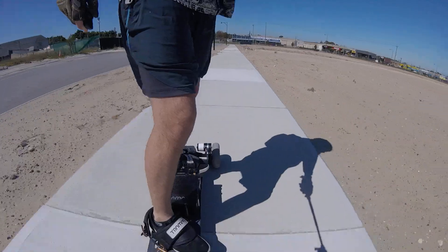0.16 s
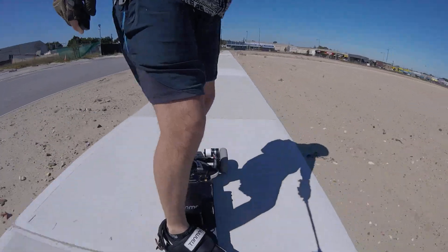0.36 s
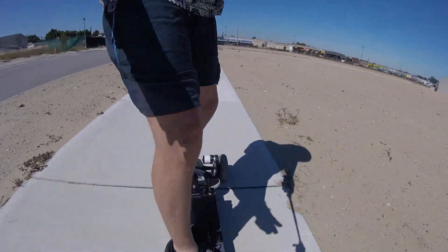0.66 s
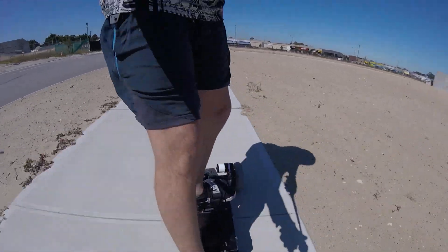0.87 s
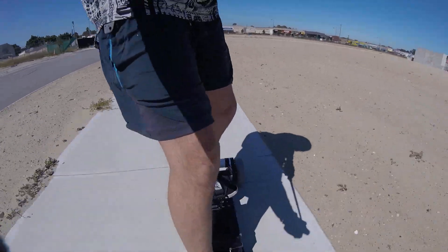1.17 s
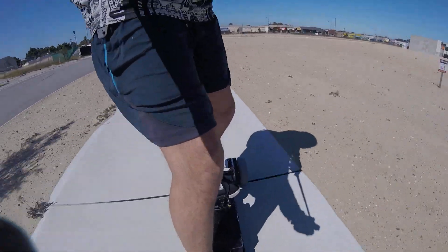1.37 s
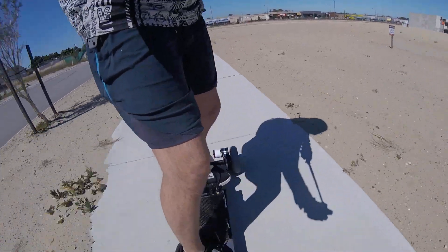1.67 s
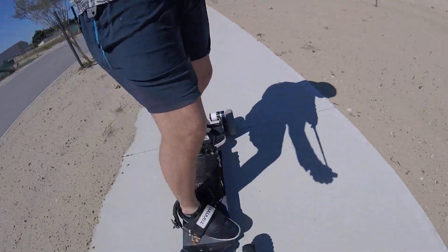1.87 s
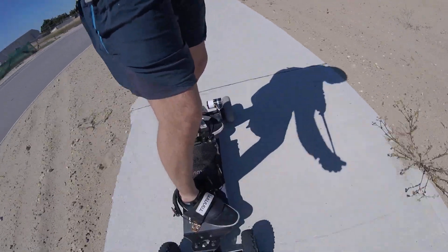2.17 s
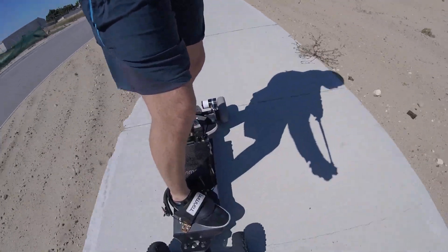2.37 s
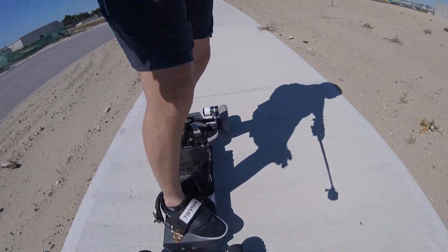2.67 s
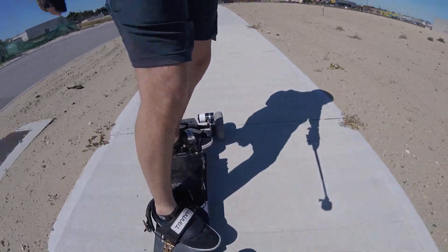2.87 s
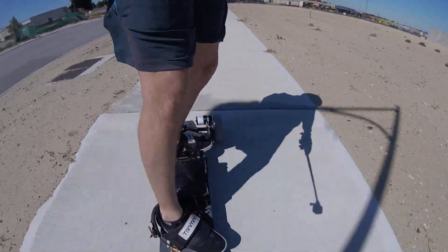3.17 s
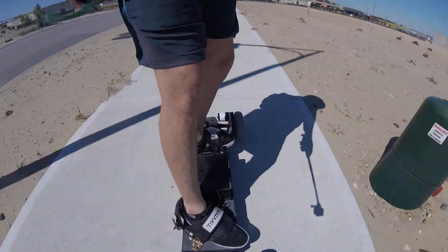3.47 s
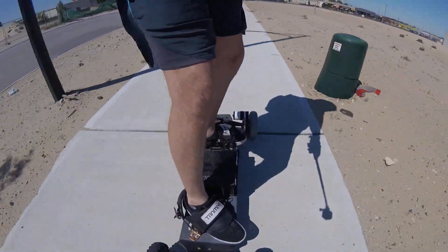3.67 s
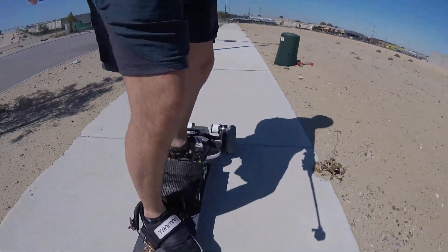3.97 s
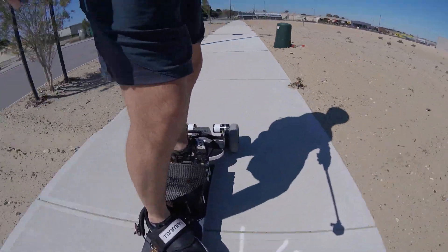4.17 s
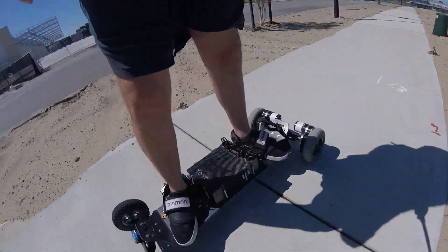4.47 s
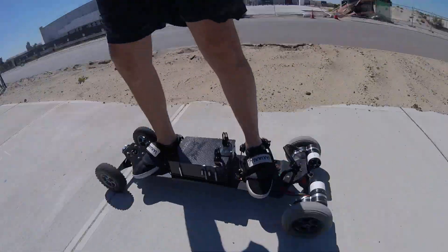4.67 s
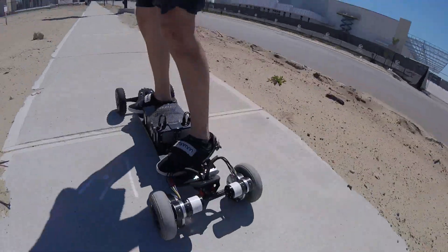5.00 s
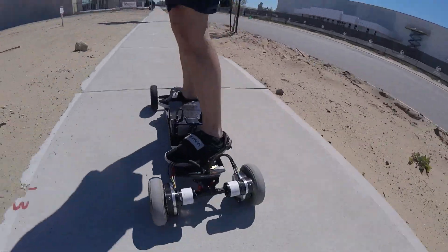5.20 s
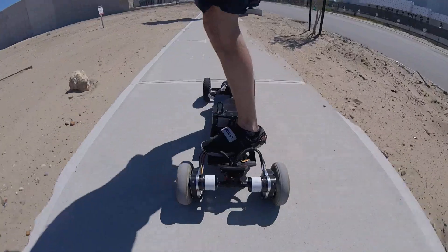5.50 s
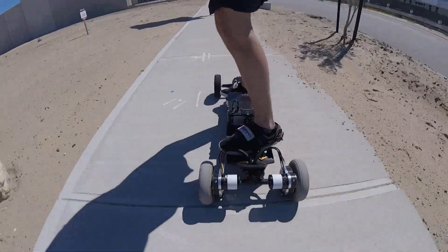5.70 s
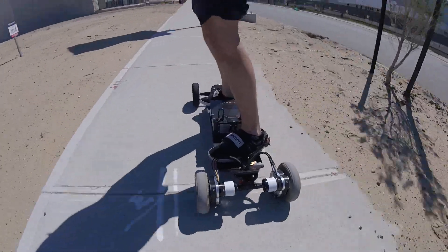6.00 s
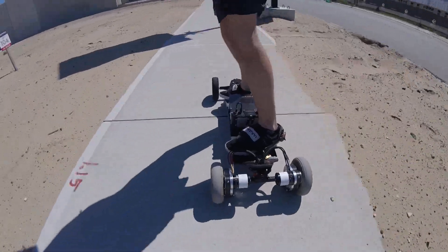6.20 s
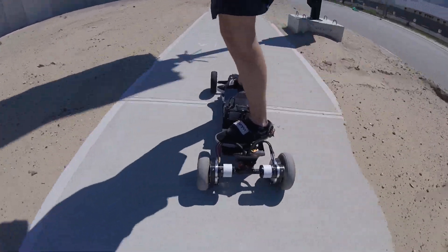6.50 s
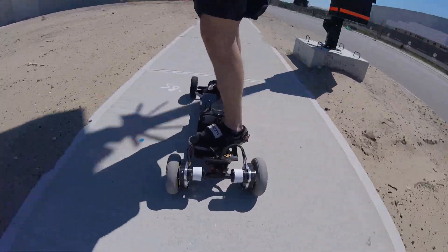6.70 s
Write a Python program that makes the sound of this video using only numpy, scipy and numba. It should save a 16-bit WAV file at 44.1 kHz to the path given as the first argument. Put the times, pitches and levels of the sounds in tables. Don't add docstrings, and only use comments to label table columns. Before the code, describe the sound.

Heavy wind rumbles and thumps on a small microphone while a motorized board grinds along a concrete path, rattling over joints and whining faintly.

```python
import sys
import numpy as np
from scipy import signal
from scipy.fft import rfft, irfft
from scipy.io import wavfile
from scipy.ndimage import uniform_filter1d
from numba import njit

SR = 44100
rng = np.random.default_rng(int(sys.argv[2]) if len(sys.argv) > 2 else 0)


def dump_mix(stems):
    frames = np.atleast_2d(stems).T
    limited = np.clip(frames, -1, 1)
    pcm = np.round(limited * 32767).astype(np.int16)
    wavfile.write(sys.argv[1], SR, pcm)


def decibels_to_gain(level_db):
    exponent = np.asarray(level_db, float) / 20
    return 10 ** exponent


N = 302085
T = np.arange(N) / SR

# start_s, gust_db, tearing_db (above the rumble)
GUSTS = [(0, -15, -9.5), (.5, -17.5, -9.5), (.77, -25.5, -14.5), (.92, -19, -15), (1.315, -19.5, -10),
         (1.335, -32, -6.5), (1.96, -39.5, -10), (2.0, -28, -5.5), (2.4, -29, 3.5), (2.44, -26.5, -9),
         (2.55, -35, -13), (3.1, -25, -11.5), (3.59, -31, -8.5), (4.4, -24, -14), (4.53, -32, -2),
         (4.55, -48, 6.5), (5.5, -34.5, -14.5), (5.8, -41, -9)]
# start_s, length_s, extra_db
BUFFETS = [(.36, 0.037, -5), (.5, 0.041, -6), (1.2, 0.11, 2.5), (1.46, 0.051, 2.5), (2.53, 0.17, -3),
           (3.14, 0.05, 4), (3.32, 0.045, 4), (3.47, 0.027, -6), (3.4, 0.052, 6), (.03, 0.21, -2.5),
           (2.03, 0.093, -4), (4.36, 0.034, 1.5), (6.55, .2, 4), (5.55, .07, 2), (1.3, .04, 2),
           (3.65, 0.098, 0), (4.22, 0.046, -4.5), (5.2, 0.093, 3), (5.644, .11, 15.5), (5.87, 0.18, -6),
           (6.052, .12, 3), (6.17, .04, -9), (6.422, 0.19, 3)]
# pitch_hz, level_db (per Hz)
RUMBLE_COLOUR = [(47, -29), (80, 5), (200, 7), (350, -3.5), (480, -15), (620, -21), (1060, -120)]
# pitch_hz, level_db (per Hz)
SWAY_COLOUR = [(14, -33), (25, -7.5), (70, -7.5), (110, -10), (200, -23)]
# start_s, peak_db, swing_hz, crack_db (above the peak)
SLAPS = [(0.397, -8, 132, -29), (0.532, -1, 108, -26), (0.846, -5, 64.6, -25), (2.002, -17, 247, -17),
         (2.211, -20, 133, -6), (2.415, -5.5, 137, -25), (2.438, -12.5, 116, -27), (3.346, -9, 102, -33.5),
         (3.643, -15, 90, -21), (4.106, -4, 114, -31), (5.503, -11.5, 128, -23), (5.646, -13, 96.5, -20),
         (5.668, -2.5, 87, -14), (5.682, -24, 67.3, -19), (5.699, -8, 133, -17), (5.714, -36, 64, -14),
         (5.73, -14.5, 176, -5.5), (5.74, -11.5, 58.4, -11), (6.053, -16, 75.4, -44.5),
         (6.123, -20, 65.5, -18), (6.431, -29, 59.2, -22), (6.497, -12.5, 171, -48),
         (6.717, -21, 77.6, -16), (6.823, -5, 157, -10.5), (6.835, -8, 51.4, -16)]
# start_s, peak_db, tick_db (above the peak), thud_db
KNOCKS = [
    (1.747, -10.5, -8.5, -36),
    (1.786, -10.5, -13, -20),
    (1.923, -16.5, -36, -17.5),
    (2.097, -20.5, -43, -18.5),
]
# pitch_hz, level_db, t60_s
STICK_MODES = [(622, 4.5, 0.01), (1180, 5.5, 0.003), (1790, -19, 0.007)]
# pitch_hz, level_db, t60_s
CASE_MODES = [(2600, -3, 0.0044), (3350, 6.5, 0.0024), (4870, 2, 0.0052), (5630, 5.5, 0.0033),
              (6330, 4.5, 0.0089), (7630, -4, 0.0064)]
# start_s, dip_db, recovery_s
DUCKS = [
    (1.79, -3.5, 0.31),
    (1.93, -0.5, .25),
    (5.625, -12, 0.63),
]
# start_s, peak_db, length_s, bright_db (above the body)
RATTLES = [(0.26, -25, 0.04, -29), (0.348, -30.5, 0.037, -21), (0.473, -27, 0.024, -15),
           (1.375, -30.5, 0.032, -39), (1.6, -26, 0.063, -35), (1.856, -29, 0.013, -45),
           (2.288, -40, 0.031, -8), (2.362, -26.5, 0.04, -17), (2.483, -28.5, 0.03, -11.5),
           (2.593, -30.5, 0.045, -18), (2.782, -31.5, 0.046, -25), (2.832, -44.5, 0.026, -32),
           (3.101, -18, 0.057, -18), (3.16, -36, 0.036, -6), (3.232, -24, 0.047, -24),
           (3.37, -19, 0.057, -18.5), (3.413, -28, 0.038, -6), (3.5, -23, 0.05, -33),
           (3.6, -29.5, 0.059, -27), (3.648, -44.5, 0.022, -24), (3.673, -29, 0.012, -11),
           (3.811, -27.5, 0.028, -16), (3.853, -38.5, 0.02, -13), (3.92, -29, 0.021, -12.5),
           (4.222, -31, 0.034, -37), (4.357, -34, 0.035, -37), (4.5113, -19, 0.025, -19),
           (4.643, -25.5, 0.021, -42), (5.077, -26, 0.047, -26), (6.704, -32.5, 0.044, -28)]
# start_s, peak_db, length_s, bright_db (above the body)
TICKS = [(0.246, -22, 0.013, -29), (0.5638, -24, 0.0031, -37), (0.687, -24.5, 0.0079, -33),
         (0.9098, -27.5, 0.0073, -23), (1.034, -28, 0.0062, -34), (1.146, -24, 0.006, -34),
         (1.7586, -52, 0.0033, -25), (1.9744, -31, 0.0062, -37), (3.394, -17.5, 0.011, -23),
         (4.6079, -28, 0.0061, -43), (4.6772, -22, 0.0068, -46), (4.9437, -23.5, 0.008, -25),
         (5.249, -23.5, 0.0066, -33), (5.286, -23.5, 0.01, -31), (5.5035, -26, 0.01, -25)]
# pitch_hz, width_hz, level_db
RATTLE_BODY = [(1030, 1250, 15), (2120, 1950, 8), (3440, 4000, -2.5), (4980, 920, 7), (7400, 760, -3)]
# on_s, off_s, rise_s, whine_db (gears), hum_db (housing)
THROTTLE = [
    (-.1, .49, .02, -41.5, -41),
    (2.5, 3.47, 0.13, -48, -51.5),
    (4.6, 4.75, 0.061, -53, -47.5),
    (6.097, 6.95, 0.34, -45.5, -47.5),
]
CHIRP_DEPTH = [3, 7.5, 5, 2.5]
# on_s, off_s
COIL_TIMES = [
    (-.1, .5),
    (6.07, 6.95),
]
# pitch_hz, level_db
COIL_LINES = [
    [(9432, -66.5), (10567, -68)],
    [(7058, -79), (7897, -65), (8156, -73), (9162, -86), (9340, -74), (9582, -66), (9997, -94),
     (10234, -80), (10411, -69), (10605, -70), (10880, -81), (12075, -97)],
]
# start_s, rough_db
ROUGHNESS = [(0, 3.5), (.2, 1.5), (.36, 4), (.51, -1), (.9, -0.5), (1.61, 0), (2.05, -3), (2.33, -2),
             (2.77, 0.5), (3.08, 0), (3.43, 1), (3.61, 1.5), (3.97, 0), (4.29, 0), (4.96, 2), (5.6, 0.5),
             (6.75, -2.5), (6.85, -11)]
# start_s, length_s, extra_db
FLEXES = [
    (.15, 0.51, -13),
    (1.0, 0.32, -7),
    (1.4, 0.39, 3.5),
    (4.9, 0.094, 8),
    (5.2, 0.19, 6.5),
    (5.9, .9, -0.5),
]
# pitch_hz, level_db (per Hz)
TREAD_COLOUR = [(350, -3.5), (600, -4), (848, -4), (1070, 2), (1650, -2.5), (2750, -5.5), (4150, -15),
                (4910, -19.5), (5600, -22), (7280, -54), (12300, -120)]
# pitch_hz, level_db (per Hz)
HISS_COLOUR = [(2470, -14), (4200, -4), (5030, 2.5), (5580, 3.5), (5870, 2), (6190, -8), (6700, -0.5),
               (7260, -5.5), (9870, -16), (10900, -19), (14200, -56), (22000, -120)]
# pitch_hz, level_db (per Hz)
AIR_COLOUR = [(7000, -31), (8500, -0.5), (10000, -2), (11500, -4), (13800, -4.5), (14500, -36)]
# pitch_hz, limit_db
HIDING = [(5500, -32), (6300, -33), (8500, -30.5), (9500, -26), (10300, -28.5), (11000, -33), (14000, -48)]


def unit(x):
    return x / np.sqrt(np.mean(x ** 2))


def noise():
    return rng.standard_normal(N)


def curves(table):
    s, *columns = np.transpose(table)
    return [np.interp(T, s, c) for c in columns]


def gate(on, off, rise, fall):
    return np.clip(np.minimum((T - on) / rise, (off - T) / fall), 0, 1)


def swells(table, rise, fall):
    return sum(db * gate(s, s + length, rise, fall) for s, length, db in table)


def walk(rate):
    hold = int(SR / rate)
    steps = np.repeat(rng.standard_normal(N // hold + 1), hold)
    smooth = uniform_filter1d(uniform_filter1d(steps, hold), hold)
    return unit(smooth[:N])


@njit
def svf(x, hz, width):
    y, b, l = np.empty(len(x)), 0., 0.
    for i in range(len(x)):
        g, k = np.tan(np.pi * hz[i] / SR), width / hz[i]
        v = (b + g * (x[i] - l)) / (1 + g * (g + k))
        b, l, y[i] = 2 * v - b, l + 2 * g * v, k * v
    return y


def band(x, hz, width_hz):
    hz = hz + np.zeros(N)
    return svf(svf(x, hz, 1. * width_hz), hz, 1. * width_hz)


def coloured(table, shared_db, flicker_db, rate):
    hz, db = np.transpose(table)
    f = np.maximum(np.fft.rfftfreq(N, 1 / SR), 1)
    shape = rfft(noise()) * decibels_to_gain(np.interp(np.log(f), np.log(hz), db, left=-150, right=-150))
    octave = np.log2(f / hz[0])
    out = 0
    for centre in np.arange(0, np.log2(hz[-1] / hz[0]) + .5, .5):
        share = np.cos(np.pi / 2 * np.clip(2 * (octave - centre), -1, 1)) ** 2
        out = out + irfft(shape * share, N) * decibels_to_gain(shared_db + flicker_db * walk(rate))
    return unit(out)


def add(out, s, x):
    i = int(s * SR)
    out[i:i + len(x)] += x[:N - i]


def ring(modes):
    t = T[:SR // 8]
    x = -sum(decibels_to_gain(db) * np.sin(2 * np.pi * hz * t) * 1000 ** (-t / t60) for hz, db, t60 in modes)
    return x / np.max(np.abs(x))


def behind(front, back):
    swing_s, swing_length_s = 4.7, 0.37
    return front + (back - front) * np.clip((T - swing_s) / swing_length_s + .5, 0, 1)


def duck():
    return decibels_to_gain(sum(db * (T > s) * np.exp(-np.maximum(T - s, 0) / back) for s, db, back in DUCKS))


def wind():
    rumble_db, tear_db = curves(GUSTS)
    rumble_db = rumble_db + swells(BUFFETS, .02, .015) + 1.28 * walk(9)
    sway_db = 4 - 0.48 * (rumble_db + 40)
    lumps = walk(28)
    rumble = coloured(RUMBLE_COLOUR, 1.12 * lumps, 0.87, 14)
    rumble = unit(rumble - .12 * (rumble ** 2 - 1))
    sway = coloured(SWAY_COLOUR, 2.2 * lumps, 1.6, 9)
    tear = unit(band(noise(), 358, 424) * decibels_to_gain(1.4 * lumps + 3.4 * walk(60)))
    out = decibels_to_gain(rumble_db - 0.5) * (rumble + decibels_to_gain(sway_db + 3.0) * sway + decibels_to_gain(tear_db - 0.2) * tear)
    return out + slaps()


def slaps():
    out = np.zeros(N)
    crack = np.convolve(ring([(336, 9, 0.0059), (700, -12, 0.0034)]), np.hanning(31) / 15)
    for s, db, hz, crack_db in SLAPS:
        t = T[:int(2.5 * SR / hz)] * hz
        swing = np.sin(2 * np.pi * t) * np.exp(-t / 0.79) * (1 - np.exp(-t / 0.12))
        add(out, s + 0.0018, decibels_to_gain(db - 1.0) * swing)
        add(out, s + 0.00258, -decibels_to_gain(db + crack_db + 9.5) * crack)
    return out


def knocks():
    out = np.zeros(N)
    thud = ring([(35.2, -5, 0.1), (70, -13, 0.028)])
    for s, db, tick_db, thud_db in KNOCKS:
        strike = ring(STICK_MODES) + decibels_to_gain(tick_db + 12.0) * ring(CASE_MODES)
        strike = np.convolve(strike, np.hanning(6) / 2.55)
        add(out, s + .0022, decibels_to_gain(db + 6.0) * strike)
        add(out, s + 0.005, -decibels_to_gain(thud_db + 13.0) * thud)
    return out


def rattles():
    dense = rng.random(N) < 3500 / SR
    click_db = np.minimum(1.7 * rng.exponential(size=N), 8.0)
    clicks = unit(dense * noise() * decibels_to_gain(click_db))
    body = unit(sum(decibels_to_gain(db) * band(clicks, hz, width) for hz, width, db in RATTLE_BODY))
    sparse = rng.random(N) < 130 / SR
    bright = unit(band(sparse * decibels_to_gain(4.0 * noise()), 9600, 900))
    tinkle_db = -71 + 2 * curves(ROUGHNESS)[0] + behind(0, 4) + 4.0 * walk(8.24)
    out = decibels_to_gain(tinkle_db) * bright * duck()
    for s, db, length, bright_db in RATTLES + TICKS:
        t = T[:int(2 * length * SR)] / length
        i = int(s * SR)
        swarm = np.minimum(t / 0.47, 1) / (1 + t ** 6)
        mix = (body + decibels_to_gain(bright_db - 0.5) * bright)[i:i + len(t)]
        add(out, s, decibels_to_gain(db - 9.0) * swarm * unit(mix))
    return out


def drive():
    idle_whine_db, idle_hum_db, let_go_s = -56.5, -57, 0.046
    load = np.array([gate(on, off, rise, let_go_s) for on, off, rise, _, _ in THROTTLE])
    whine_db = idle_whine_db + (np.array(THROTTLE)[:, -2] - idle_whine_db) @ load
    hum_db = idle_hum_db + (np.array(THROTTLE)[:, -1] - idle_hum_db) @ load
    turn = 2 * np.pi * np.cumsum(60 * (1 + 0.15 * walk(40))) / SR
    chirp_db = 4 + (np.array(CHIRP_DEPTH) - 4) @ load
    stutter = decibels_to_gain(chirp_db * np.cos(turn) + 1.8 * walk(60))
    mesh = np.sin(2 * np.pi * np.cumsum(4870 + 70 * walk(160)) / SR)
    whine = unit((mesh + unit(band(noise(), 4894, 410))) * stutter)
    housing_hz = behind(3525, 3190)
    hum = unit(band(noise(), housing_hz, 600) * np.sqrt(stutter))
    return decibels_to_gain(whine_db + 2.1) * whine + decibels_to_gain(hum_db - 0.5) * hum + coils()


def coils():
    out = np.zeros(N)
    for (on, off), lines in zip(COIL_TIMES, COIL_LINES):
        current = gate(on, off, .03, .03)
        for hz, db in lines:
            phase = 2 * np.pi * np.cumsum(hz + 5.0 * walk(21)) / SR
            out += current * decibels_to_gain(db + 8.0 + 2.6 * walk(11)) * np.sin(phase)
    buzz = unit(band(noise(), 8000, 1100))
    return out + decibels_to_gain(-53.5) * (T > COIL_TIMES[1][0]) * buzz


def tyres():
    rough, = curves(ROUGHNESS)
    tread_db = -46 + rough
    hiss_db = -55 + 0.92 * rough + behind(0, 0.5)
    air_db = -79.5 + 1.6 * rough + behind(0, 8)
    deck_db = -42 + 0.5 * rough + behind(0, 2.5) + swells(FLEXES, 0.046, 0.037)
    deck_hz = behind(1080, 1470) * (1 + 0.037 * walk(6))
    jolt = walk(22.093)
    tread = coloured(TREAD_COLOUR, 0.99 * jolt, 0.96, 35)
    deck = unit(band(noise(), deck_hz, 280) * decibels_to_gain(1.7 * jolt + 2.6 * walk(45)))
    axle = unit(band(noise(), 2565, 400) * decibels_to_gain(2.0 * jolt)) * behind(1, 0)
    tread = tread + decibels_to_gain(-11.0) * axle
    hiss = coloured(HISS_COLOUR, 0.7 * jolt, 1.45, 40)
    air = coloured(AIR_COLOUR, .8 * jolt, 1.5, 30)
    out = decibels_to_gain(tread_db + 4.5) * tread + decibels_to_gain(deck_db - 3.5) * deck
    return out + decibels_to_gain(hiss_db + 4.5) * hiss + decibels_to_gain(air_db + 13.0) * air


def scene():
    board = duck() * (drive() + tyres())
    return (wind() + knocks() + rattles() + board)[None]


def starve(x, leak_db):
    size = 2048
    f, _, z = signal.stft(x, SR, nperseg=size)
    power = uniform_filter1d(np.abs(z) ** 2, size=8, axis=0)
    power = power[4::8].repeat(8, axis=0)
    f = f[:-1]
    mid = np.mean(power[(f > 2000) & (f < 4300)], axis=0)
    mid = mid + decibels_to_gain(-27) ** 2 * np.mean(power[f < 500], axis=0)
    limit = decibels_to_gain(np.interp(f, *np.transpose(HIDING), left=-99))[:, None] ** 2
    z[:-1] *= np.where(power < mid * limit, decibels_to_gain(leak_db), 1)
    return signal.istft(z, SR, nperseg=size)[1][:N]


def roll_off(x):
    return signal.sosfilt(signal.butter(12, 13950, fs=SR, output="sos"), x)


def record(dry):
    low = signal.sosfiltfilt(signal.butter(6, 10300, fs=SR, output="sos"), dry)
    x = low + decibels_to_gain(-12.5) * (dry - low)
    x = signal.sosfilt(signal.butter(1, 18, "high", fs=SR, output="sos"), x)
    rounded = np.tanh(1.152 * x[0]) / 1.25
    mix = starve(rounded, -26.5)[None]
    return roll_off(mix)


dry = scene()
out = record(dry)
dump_mix(out)
```